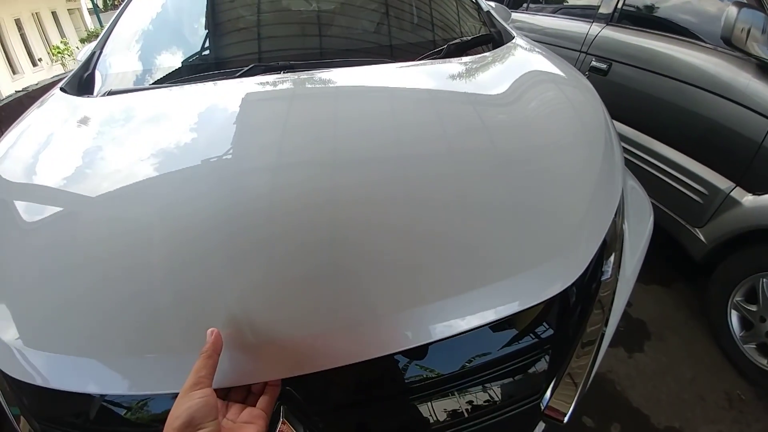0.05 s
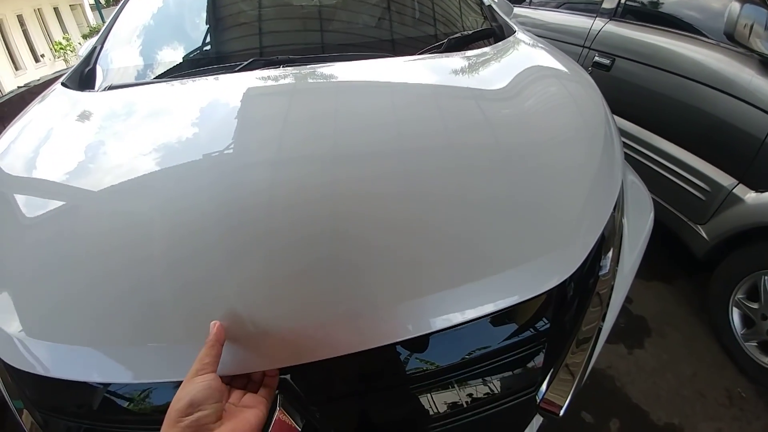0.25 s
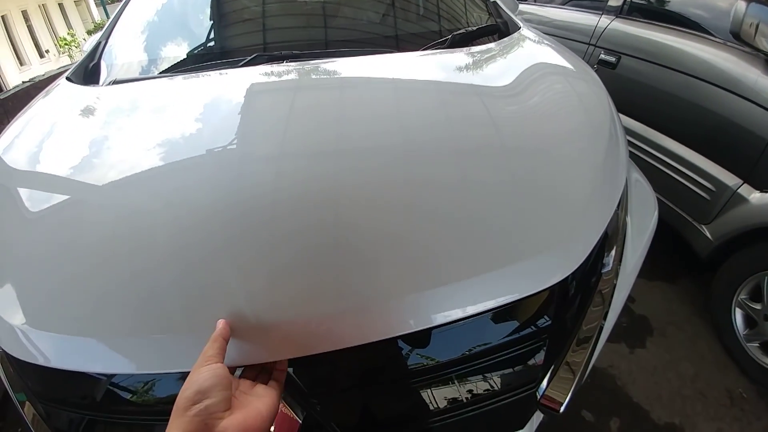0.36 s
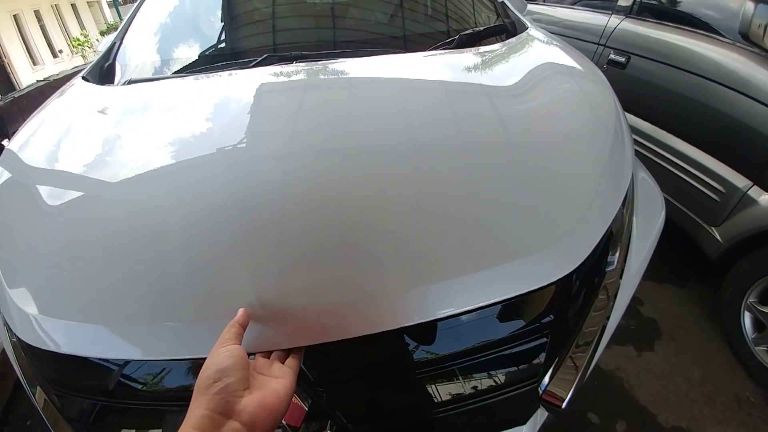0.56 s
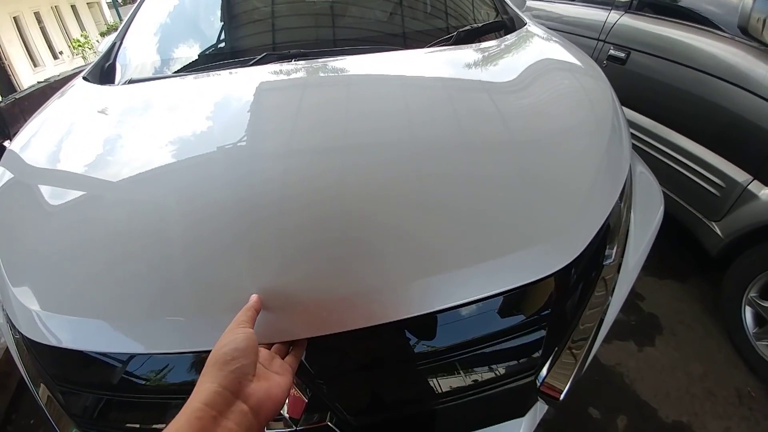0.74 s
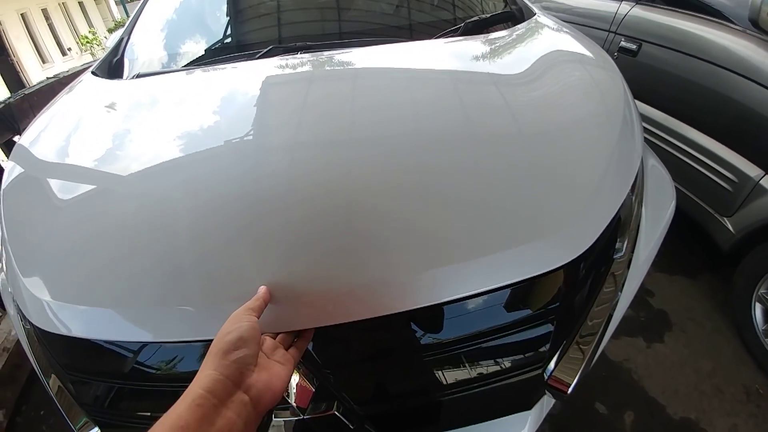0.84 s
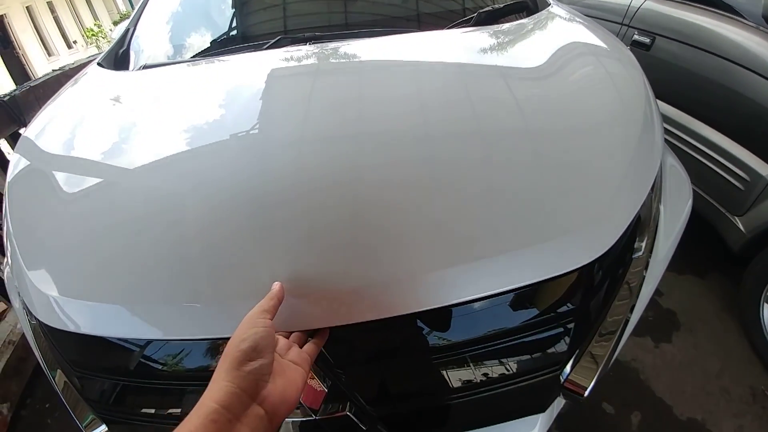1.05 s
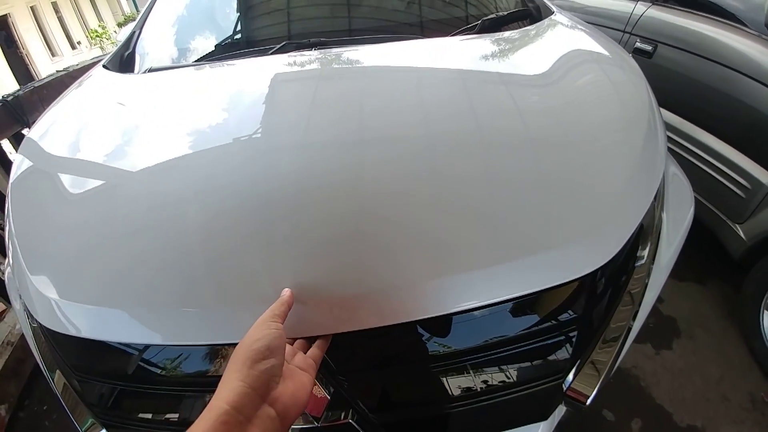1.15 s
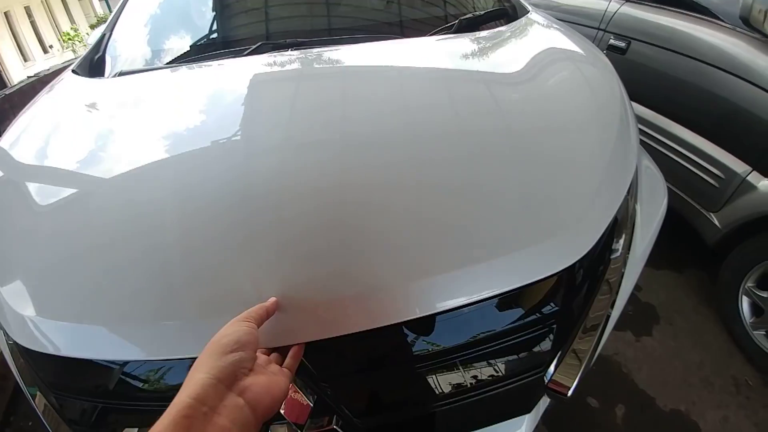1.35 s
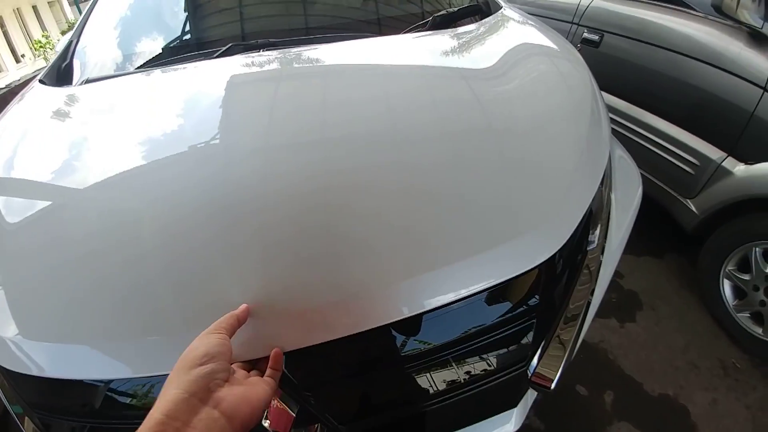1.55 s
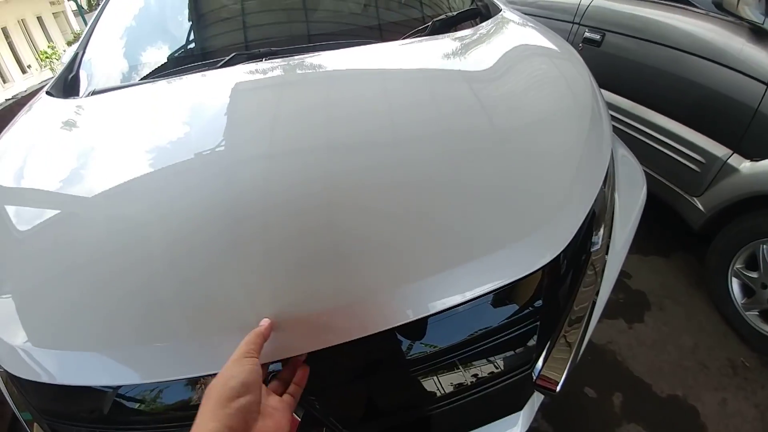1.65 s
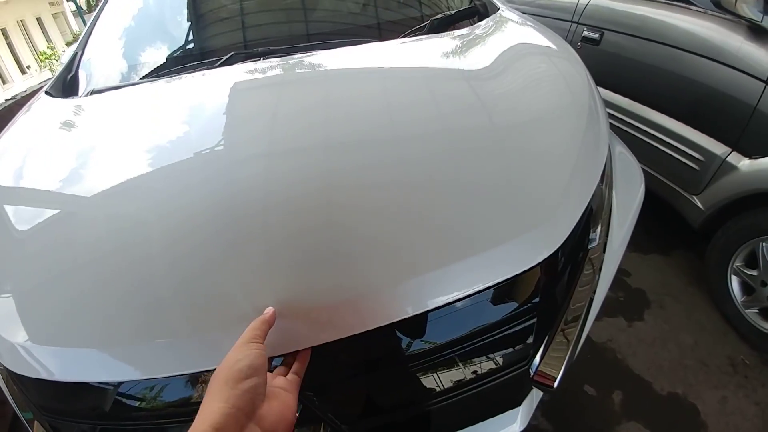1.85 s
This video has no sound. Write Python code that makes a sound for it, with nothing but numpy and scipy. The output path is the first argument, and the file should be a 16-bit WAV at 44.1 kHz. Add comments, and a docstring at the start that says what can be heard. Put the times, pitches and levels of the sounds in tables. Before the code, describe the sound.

Hollow thuds and rattle of a car hood at its latch, quick burst first, one weaker knock after.

```python
"""An open yard: far traffic rumbles, air hisses, and a hand works the latch under a car bonnet.
The steel panel booms and rattles under a quick run of blows, is tapped faintly, then knocks again later:
blows ring its modes and start noise bands. The catch ticks (noise bursts into resonators) and fingers slide
on the paint (coloured noise). A faint squeal (wavering sine), short thin tones and a high hiss (noise in
narrow peaks) come and go. Two microphone ports, each with its own treble colour, pick it up."""
import sys
import numpy as np
from scipy import signal
from scipy.fft import rfft, irfft, next_fast_len
from scipy.io import wavfile

SR = 44100
rng = np.random.default_rng(int(sys.argv[2]) if len(sys.argv) > 2 else 0)


def file_out(sig):
    """Save sig as 16-bit WAV at sys.argv[1]."""
    # one column per channel
    cols = np.atleast_2d(sig).T
    # limit, then scale
    lim = np.clip(cols, -1, 1)
    pcm = np.round(lim * 32767).astype(np.int16)
    wavfile.write(sys.argv[1], SR, pcm)


def ratio_of_db(decibels):
    """Turn decibels (scalar or array-like) into linear amplitude factors; 0 dB maps to 1."""
    return 10 ** (np.asarray(decibels, float) / 20)


N = 83790

# Levels are relative, ahead of the ports.
# traffic spectrum: freq_hz, density_db
TRAFFIC_SPECTRUM = [(16, -54), (28, 6), (59, -1.5), (77, -3), (97, -5), (146, -0.5), (161, -10), (187, -6),
                    (310, -15), (577, -6.5), (780, -20.5), (856, -16), (1370, -30.5), (1560, -31),
                    (2500, -37), (3250, -42), (5500, -120)]
# traffic level over time: time_s, level_db
TRAFFIC_LEVEL = [(0, -46), (0.151, -44), (0.601, -46), (0.999, -45), (1.5, -42), (1.7, -45), (1.9, -42)]
# air hiss spectrum: freq_hz, density_db
AIR_SPECTRUM = [(1000, -10.5), (2500, 2), (5000, -0.5), (10000, -6), (15500, 0.5)]
AIR_DB = -64
# left-right likeness of near and far noise: freq_hz, likeness (below 0 counts as 0)
NEAR_LIKENESS = [(100, 0.89), (500, 0.82), (1500, 0.74), (4000, 0.52), (12000, 1)]
FAR_LIKENESS = [(60, 0.96), (180, 0.96), (550, 0.56), (1650, 0.34), (4970, -0.81), (15000, -0.45)]

# high hiss, one row: start_s, length_s, level_db
HISS = (1, 0.14, -59.5)
# peaks of the hiss: centre_hz, width_hz, level_db
HISS_PEAKS = [(13950, 500, 0), (12400, 800, -10), (10600, 1200, -14)]
# short thin tones: start_s, length_s, centre_hz, width_hz, level_db
THIN_TONES = [(.39, .12, 11400, 80, -76), (1.31, .13, 11450, 80, -77)]
# growing squeal: time_s, pitch_hz, level_db
SQUEAL = [(1.42, 3240, -81), (1.471, 3230, -65), (1.56, 3160, -68), (1.64, 3244, -65.5),
          (1.72, 3330, -58.5), (1.8, 3300, -62.5), (1.9, 3300, -58)]
SQUEAL_WOBBLE_HZ, SQUEAL_FLICKER_DB = 35, 4

# finger slides: start_s, rise_s, fall_s, level_db, centre_hz
SLIDES = [(.12, 0.017, .2, -64, 7000), (.44, 0.073, 0.075, -67, 9100), (.65, 0.084, 0.093, -71.5, 6100),
          (0.902, .17, 0.093, -66.5, 6100), (1.278, 0.052, 0.21, -59, 6070), (1.44, 0.1, 0.18, -65, 5760),
          (1.764, .006, 0.12, -54.5, 4170), (1.749, 0.073, 0.14, -51, 880),
          (1.769, 0.0082, 0.14, -60, 11000)]
SLIDE_DROP_DB = 13  # one octave off centre; grows as octaves squared
SLIDE_GRAIN_DB = 0.5

# catch ticks: start_s, level_db, t60_s, ring_db
TICKS = [(0.0367, -54, 0.016, -33), (.1361, -65, 0.085, -28), (.2064, -52.5, 0.034, -11.5),
         (0.245, -44.5, 0.074, -43.5), (.4973, -49.5, 0.061, -43), (0.5933, -52, 0.069, -43),
         (1.5506, -54.5, 0.022, -38), (1.6367, -51, .03, -31), (1.7694, -44, 0.042, -28),
         (1.889, -49.5, 0.056, -27.5)]
# tick spectrum: freq_hz, density_db
TICK_SPECTRUM = [(500, 13), (1200, 8), (2200, -2), (5000, -9), (10000, -4), (15000, -13)]
# catch modes: freq_hz, level_db, t60_s
CATCH_MODES = [(1947, -12, 0.13), (2085, -11, 0.35), (2415, -12.5, 0.3), (2756, -4.5, 0.28),
               (3300, -7.5, 0.22), (3590, 1, .06), (3630, 5, 0.065), (4390, -17, .08)]

# panel blows: start_s, level_db, boom_db, spot_hz, rattle_db
BLOWS = [(0.2062, -12.5, 0, 201, -20.5), (0.2452, -13, -13, 458, -21.5), (0.289, -21.5, 0.5, 417, -42.5),
         (0.311, -25.5, -15, 325, -41.5), (.343, -21.5, -6.5, 264, -46.5), (.347, -27, -5.5, 446, -52.5),
         (0.415, -40.5, -3, 250, -48.5), (0.501, -39, -14.5, 340, -44.5), (.8115, -44.5, -2, 550, -68),
         (1.637, -26.5, -3, 565, -40), (1.646, -28, -31, 950, -58), (1.674, -42, -2, 250, -55)]
# panel modes: freq_hz, level_db, t60_s
PANEL_MODES = [(69.23, -0.5, 0.62), (83.37, 0, 0.59), (132.7, -9.5, 0.28), (186.5, 1.5, 0.31),
               (232.7, -2.5, 0.39), (250, 0, 0.19), (333, -18.5, 0.68), (381.7, -7, 0.4), (408.7, -2, 0.23),
               (492.7, 2.5, 0.14), (523, 0, 0.21), (576.9, -4, 0.2), (604.3, 4, 0.083), (738.4, -7, 0.23),
               (814, -5, 0.27), (885, -16.5, 0.067), (935, -6.5, 0.11), (978, -5, 0.44),
               (1119, -25.5, 0.083), (1370, -25, 0.18), (1384, -18.5, 0.6), (1701, -25.5, 0.1)]
# dense upper modes and rattle: freq_hz, density_db, t60_s
RATTLE = [(150, 7.5, 0.14), (400, 1, 0.41), (740, 0, 0.15), (1480, -6, 0.16), (2310, -26, 0.1),
          (3710, -30.5, 0.28), (7000, -36, .2), (14000, -48.5, 0.075)]
BOOM_UNDER_HZ, BOOM_LAG_S = 160, 0.01283
MODES_DB, SCATTER_DB = -9, 1.5
SPOT_DROP_DB, SPOT_FLOOR_DB = 14.5, -8.5  # drop one octave off the spot; grows as octaves squared
KNOCK_DB, KNOCK_CYCLES = -5, 39
LONGEST_RING_CYCLES = 280  # cap on t60 of the modes
CONTACT_HZ = 2210

# colour common to both ports: freq_hz, gain_db
PORT_COLOUR = [(4500, 1.5), (5600, 2), (6600, 5), (7500, 2.5), (8400, -4.5), (9000, -18), (9600, -6),
               (10500, 1), (12000, -1.5), (15000, -8.5)]
# port balance: freq_hz, left_minus_right_db
PORT_BALANCE = [(100, -0.36), (300, -1), (700, -0.5), (1300, -1.5), (2200, -4.5), (3500, -4.5),
                (5500, -6.5), (6800, -14), (8000, -4), (9800, 11.5), (11500, 9.5), (13500, -2)]
# port phase: freq_hz, left_lead_rad
PORT_PHASE = [(0, 0), (400, .35), (1890, 2.6), (2580, 6.5), (3400, 7.6), (4130, 12.1), (4820, 13),
              (6200, 24.8), (6800, 24.4), (7840, 14.2), (9220, 12.5), (11900, 13), (12500, 6.2),
              (16000, 6.3)]
LOW_CUT_HZ = 53


def rms_one(x):
    """Scale to rms 1."""
    return x / np.sqrt(np.mean(x ** 2) + 1e-20)


def at_hz(points, hz, column=1):
    """Read a table on a log-frequency axis."""
    p = np.array(points, float)
    return np.interp(np.log(np.maximum(hz, 1)), np.log(np.maximum(p[:, 0], 1)), p[:, column])


def drift(rate_hz):
    """Random drift of spread 1: noise through two equal poles, run at SR / 40."""
    r = np.exp(-80 * np.pi * rate_hz / SR)
    white = rng.standard_normal(N // 40 + 2002)
    slow = signal.lfilter([1], [1, -2 * r, r * r], white)[2000:]  # drop the settling
    return np.interp(np.arange(N) / 40, np.arange(len(slow)), rms_one(slow))


def stereo_noise(gain_db, likeness):
    """Steady noise of a given colour, partly shared by both sides; rms 1."""
    hz = np.fft.rfftfreq(N, 1 / SR)
    mid, side = rfft(rng.standard_normal((2, N)))
    alike = np.clip(at_hz(likeness, hz), 0, 1)
    sides = np.sqrt(1 + alike) * mid + np.sqrt(1 - alike) * side * [[1], [-1]]
    return rms_one(irfft(ratio_of_db(gain_db(hz)) * sides, N))


def swell(start_s, length_s, edge_s):
    """Smooth rise, hold and fall."""
    t = np.arange(N) / SR
    from_edge_s = np.minimum(t - start_s, start_s + length_s - t)
    return np.sin(np.pi / 2 * np.clip(from_edge_s / edge_s, 0, 1)) ** 2


def dying(start_s, t60_s):
    """Sudden start, exponential fall."""
    t = np.arange(N) / SR - start_s
    return (t >= 0) * ratio_of_db(-60 * np.maximum(t, 0) / max(t60_s, 1e-3))


def ring(drive, hz, t60_s):
    """Two-pole resonator: a unit click rings a decaying sine of height 1."""
    r = ratio_of_db(-60 / (t60_s * SR))
    w = 2 * np.pi * hz / SR
    return signal.lfilter([0, np.sin(w)], [1, -2 * r * np.cos(w), r * r], drive)


def peak(hz, centre_hz, width_hz):
    """Resonance curve of height 1."""
    return 1 / (1 + (2 * (hz - centre_hz) / width_hz) ** 2)


def yard():
    """Traffic rumble that wavers, over a steady hiss of air."""
    time_s, level_db = np.transpose(TRAFFIC_LEVEL)
    rumble_db = np.interp(np.arange(N) / SR, time_s, level_db) + 1.4 * drift(9.3)
    rumble = ratio_of_db(rumble_db) * stereo_noise(lambda hz: at_hz(TRAFFIC_SPECTRUM, hz), FAR_LIKENESS)
    air = stereo_noise(lambda hz: at_hz([(300, -45)] + AIR_SPECTRUM, hz), FAR_LIKENESS)
    return rumble + ratio_of_db(AIR_DB) * air


def thin_sounds():
    """Noise in narrow peaks: the high hiss and the thin tones."""
    def hiss_db(hz):
        return 20 * np.log10(sum(ratio_of_db(db) * peak(hz, centre, width) for centre, width, db in HISS_PEAKS))

    start_s, length_s, level_db = HISS
    out = ratio_of_db(level_db) * swell(start_s, length_s, 0.058) * stereo_noise(hiss_db, NEAR_LIKENESS)
    for start_s, length_s, centre_hz, width_hz, level_db in THIN_TONES:
        tone = stereo_noise(lambda hz: 20 * np.log10(peak(hz, centre_hz, width_hz)), NEAR_LIKENESS)
        out = out + ratio_of_db(level_db) * swell(start_s, length_s, 0.02) * tone
    return out


def squeal():
    """A sine with jittering pitch and quickly flickering level."""
    time_s, table_hz, table_db = np.transpose(SQUEAL)
    t = np.arange(N) / SR
    pitch_hz = np.interp(t, time_s, table_hz) + SQUEAL_WOBBLE_HZ * drift(90)
    level_db = np.interp(t, time_s, table_db) + SQUEAL_FLICKER_DB * drift(150)
    return ratio_of_db(level_db) * np.sin(2 * np.pi * np.cumsum(pitch_hz) / SR)


def fingers():
    """Grainy rubbing noise that rises and falls, each slide with its own colour."""
    t = np.arange(N) / SR
    out = 0
    for start_s, rise_s, fall_s, level_db, centre_hz in SLIDES:
        end_s = start_s + rise_s + fall_s
        shape = np.clip(np.minimum((t - start_s) / rise_s, (end_s - t) / fall_s), 0, 1)
        grain = ratio_of_db(level_db + SLIDE_GRAIN_DB * drift(90))
        rub = stereo_noise(lambda hz: -SLIDE_DROP_DB * np.log2(hz / centre_hz + 1e-3) ** 2, FAR_LIKENESS)
        out = out + grain * shape * rub
    return out


def catch():
    """Short bursts of bright noise that also shake the modes of the catch."""
    noise = stereo_noise(lambda hz: at_hz([(100, -38)] + TICK_SPECTRUM, hz), NEAR_LIKENESS)
    ticks = noise * sum(ratio_of_db(db) * dying(s, t60) for s, db, t60, _ in TICKS)
    shake = noise * sum(ratio_of_db(db + ring_db) * dying(s, t60) for s, db, t60, ring_db in TICKS) + 1e-18
    return ticks + sum(ratio_of_db(db) * ring(shake, hz, t60) for hz, db, t60 in CATCH_MODES)


def rattle():
    """Half-octave bands of noise start with each blow and die at their own rate."""
    edges_hz = 110 * 2 ** np.arange(0, 7.4, 0.5)
    white = [stereo_noise(np.zeros_like, NEAR_LIKENESS) for _ in range(2)]
    out = 0
    for k, (low_hz, high_hz) in enumerate(zip(edges_hz, edges_hz[1:])):
        hz = np.sqrt(low_hz * high_hz)
        t60_s = at_hz(RATTLE, hz, column=2)
        shape = sum(ratio_of_db(rattle_db) * dying(start_s, t60_s) for start_s, *_, rattle_db in BLOWS)
        band = signal.butter(2, [low_hz, high_hz], "band", fs=SR, output="sos")
        # neighbouring bands use different noise
        out = out + ratio_of_db(at_hz(RATTLE, hz) + 7.5) * signal.sosfilt(band, white[k % 2] * shape)
    return out


def panel():
    """Blows knock at their spot's pitch and ring all modes, favouring near ones; the boom lags; soft contact dulls."""
    out = np.zeros(N)
    scatter = rng.standard_normal((len(BLOWS), len(PANEL_MODES)))
    for k, (hz, mode_db, t60_s) in enumerate(PANEL_MODES):
        clicks = np.full(N, 1e-18)
        is_boom = hz < BOOM_UNDER_HZ
        lag_s = BOOM_LAG_S if is_boom else 0
        for (start_s, blow_db, boom_db, spot_hz, _), chance in zip(BLOWS, scatter[:, k]):
            spot_db = max(-SPOT_DROP_DB * np.log2(hz / spot_hz) ** 2, SPOT_FLOOR_DB)
            weight_db = boom_db if is_boom else spot_db
            click_db = blow_db + mode_db + MODES_DB + SCATTER_DB * chance + weight_db
            clicks[int((start_s + lag_s) * SR)] = ratio_of_db(click_db)
        sign = (-1) ** (k // 3)  # flips every three modes
        out += sign * ring(clicks, hz, min(t60_s, LONGEST_RING_CYCLES / hz))
    for start_s, blow_db, _, spot_hz, _ in BLOWS:
        click = (np.arange(N) == int(start_s * SR)) + 1e-18
        out -= ratio_of_db(blow_db + MODES_DB + KNOCK_DB) * ring(click, spot_hz, KNOCK_CYCLES / spot_hz)
    return signal.sosfilt(signal.butter(2, CONTACT_HZ, fs=SR, output="sos"), out)


def scene():
    """Sum of all sources."""
    return yard() + thin_sounds() + squeal() + fingers() + catch() + rattle() + panel()


def top_cut(x):
    """Nothing passes above the cut-off."""
    return signal.sosfilt(signal.butter(12, 16440, fs=SR, output="sos"), x)


def record(dry):
    """The bass is cut; each port colours and delays the sound in its own way."""
    size = next_fast_len(N + 4096)
    hz = np.fft.rfftfreq(size, 1 / SR)
    half = np.array([[0.5], [-0.5]])  # left, right
    gain_db = at_hz(PORT_COLOUR, hz) + half * at_hz(PORT_BALANCE, hz)
    phase_rad = half * np.interp(hz, *np.transpose(PORT_PHASE))
    ports = ratio_of_db(gain_db) * np.exp(1j * phase_rad)
    low_cut = signal.butter(4, LOW_CUT_HZ, "high", fs=SR, output="sos")
    mix = irfft(rfft(signal.sosfilt(low_cut, dry), size) * ports, size)[:, :N]
    return top_cut(mix)


dry = scene()
out = record(dry)
file_out(out)
```